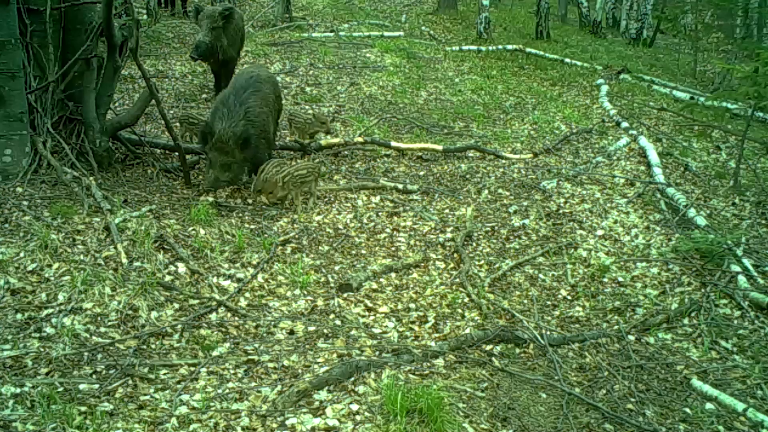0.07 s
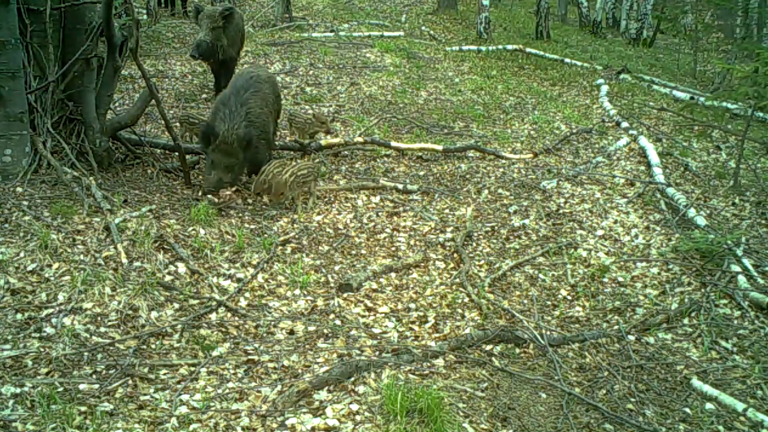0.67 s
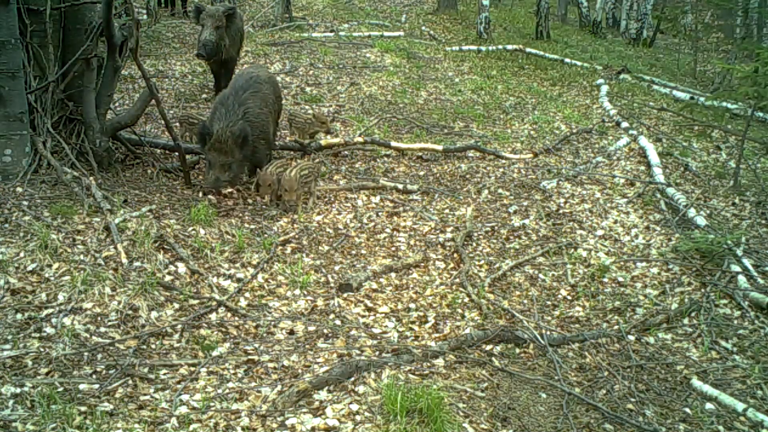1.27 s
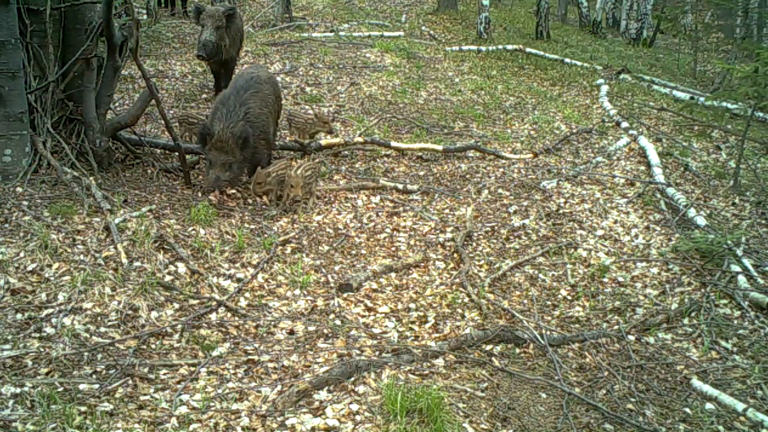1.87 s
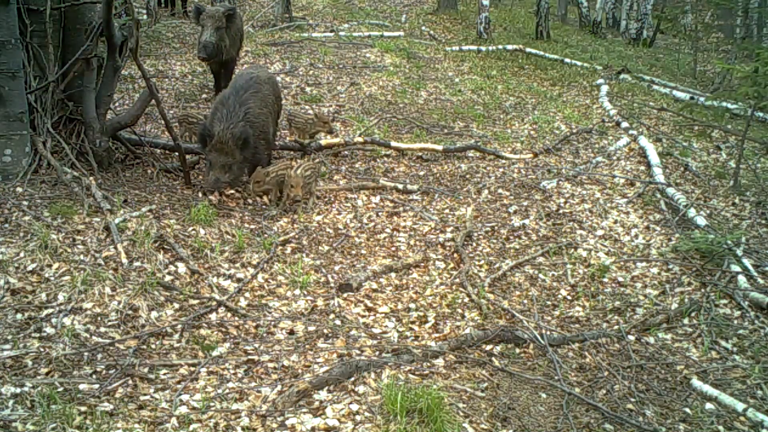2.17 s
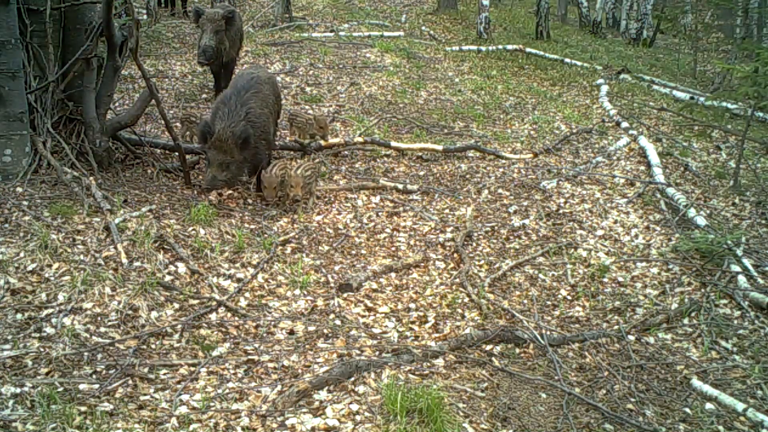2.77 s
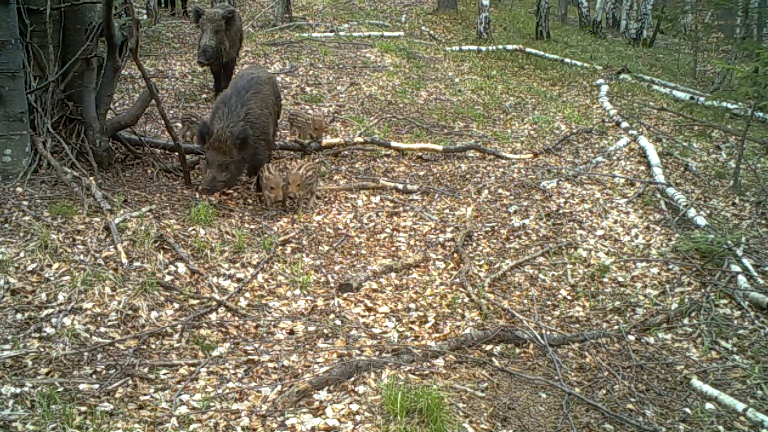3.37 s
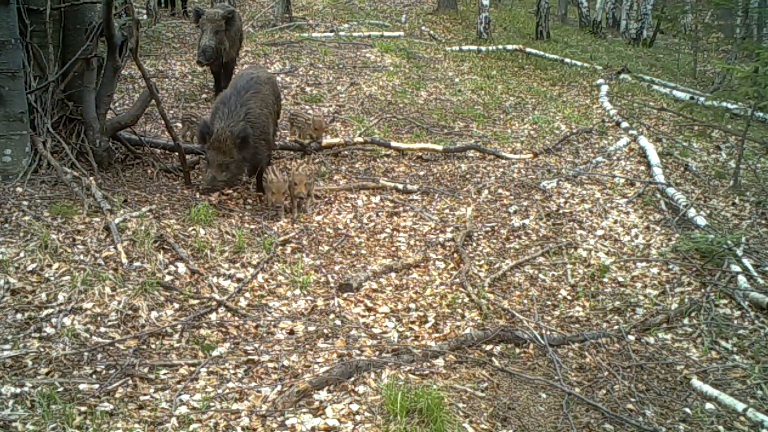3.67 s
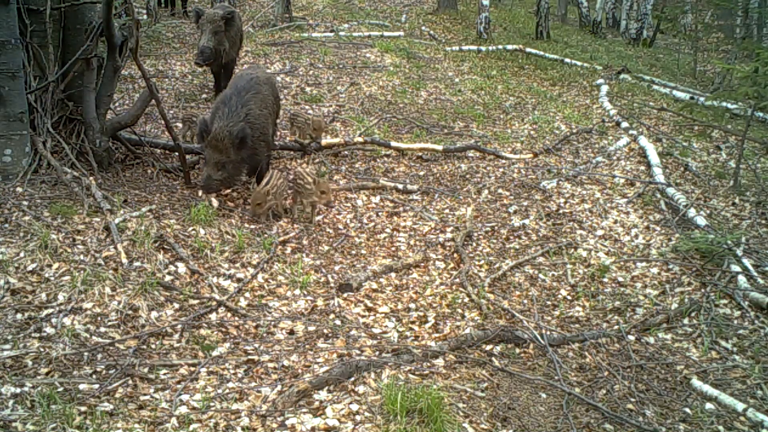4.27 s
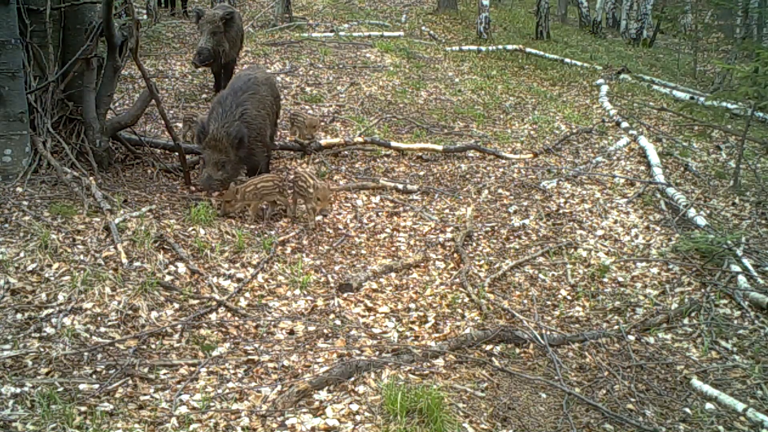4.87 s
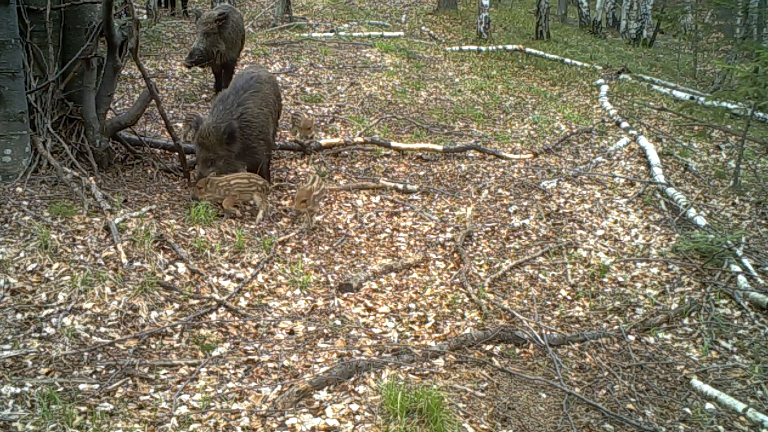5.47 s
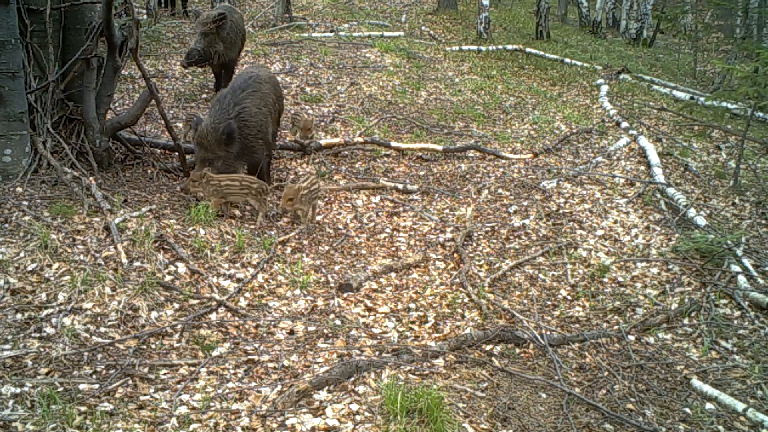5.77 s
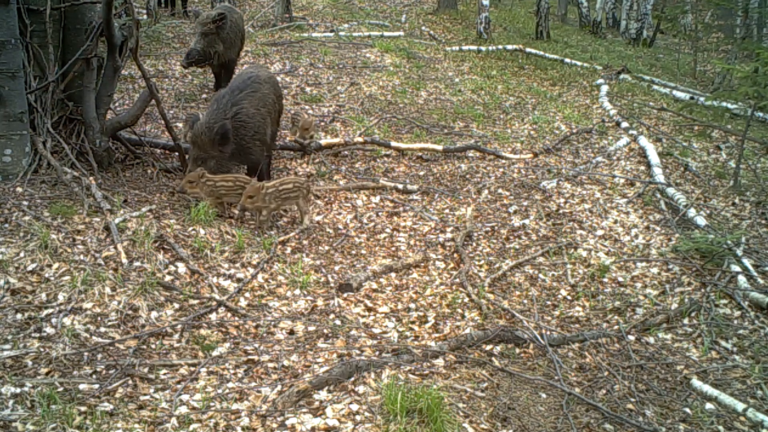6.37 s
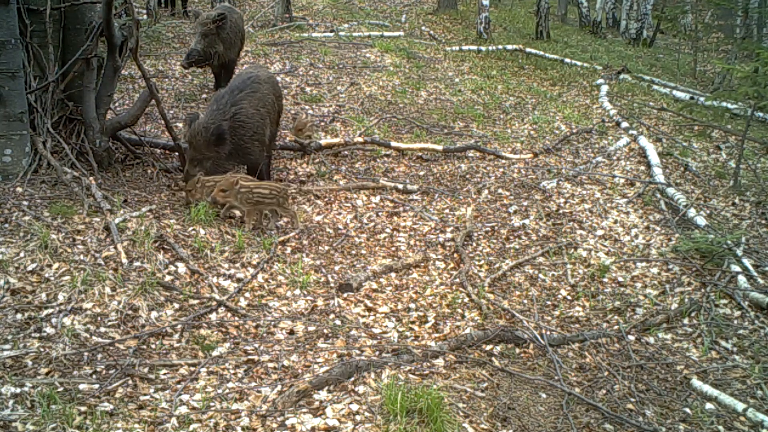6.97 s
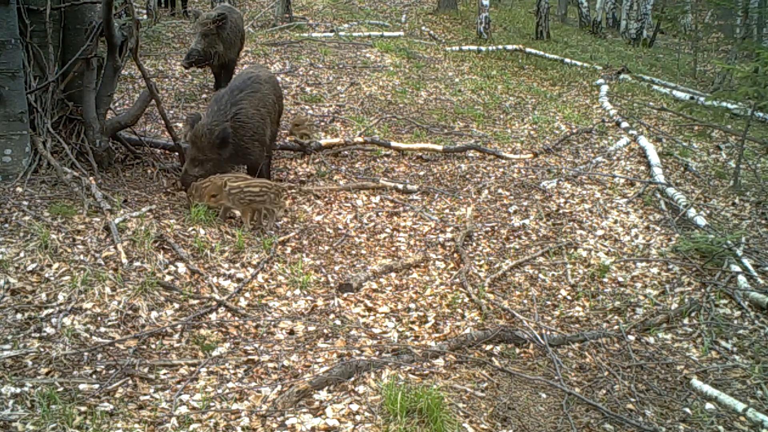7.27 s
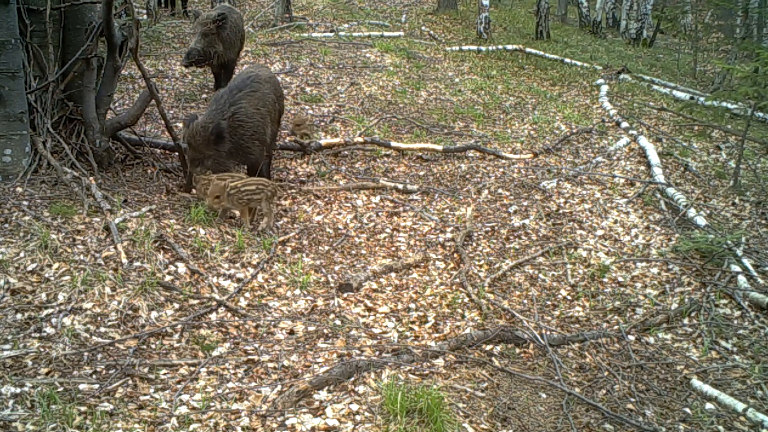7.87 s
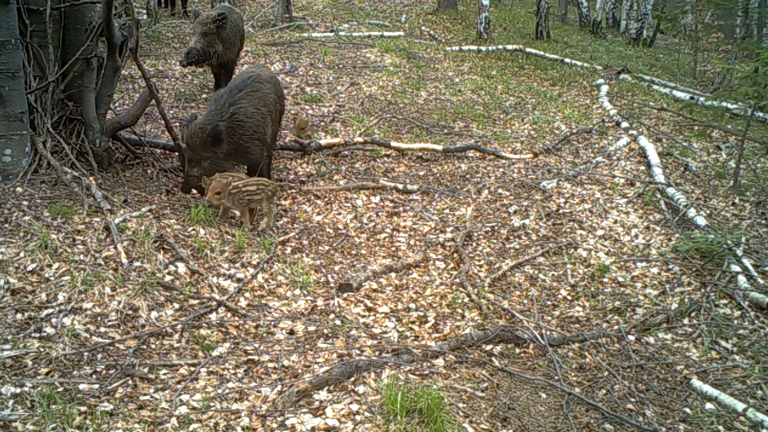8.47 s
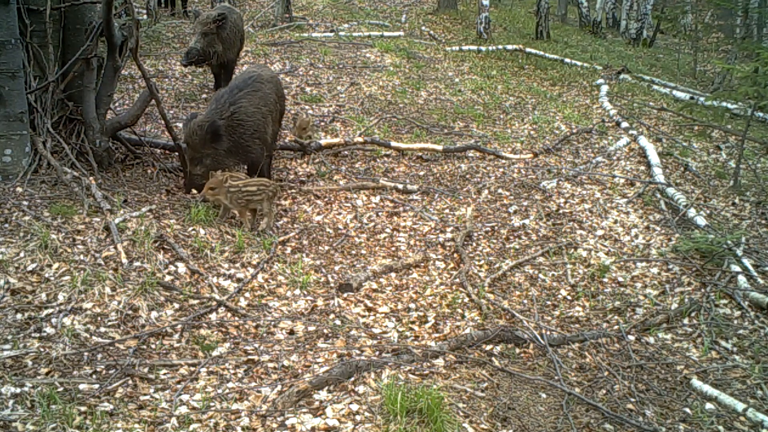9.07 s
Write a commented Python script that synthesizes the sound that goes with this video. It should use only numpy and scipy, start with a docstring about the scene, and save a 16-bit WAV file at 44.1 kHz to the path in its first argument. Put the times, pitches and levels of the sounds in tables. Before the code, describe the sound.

A trail camera's microphone switches on with a pop and a quick run of ticks. A quiet, steady hush with low rumble and hum follows in a still wood. Some metres away, wild boar and piglets forage: a couple of soft hoof falls come first, then faint shuffles and crackles in dry leaves. The rustling is busiest midway, with a few tiny twig snaps, then thins out.

```python
"""Wild boar and their piglets forage in dry leaves, some metres from a trail camera in a still wood.
Snouts and feet stir faint swarms of tiny leaf cracks; a few twigs snap and hooves puff softly in the soil.
The camera's input wakes with a pop and ticks as its gain steps up; after that a steady bed of hush,
low rumble and camera hum lies over the animals."""
import sys
import numpy as np
from scipy import signal
from scipy.fft import rfft, irfft
from scipy.io import wavfile

SR = 44100
rng = np.random.default_rng(int(sys.argv[2]) if len(sys.argv) > 2 else 0)


def transcribe(u):
    """Save the signal u as a 16-bit wav file named by the first command-line argument.

    u: samples, shape (n,) or (channels, n), limited to [-1, 1]; the rate is SR.
    q: integer samples, one column per channel.
    """
    v = np.clip(np.atleast_2d(u).T, -1, 1)
    q = np.round(v * 32767).astype(np.int16)
    wavfile.write(sys.argv[1], SR, q)


N = 402633
T = np.arange(N) / SR

# tone curve of the hush of wood and microphone: (frequency [Hz], relative level [dB])
HUSH_CURVE = [(15, -13.5), (42, -9), (60, -12.5), (90, -15), (150, -18), (280, -22), (430, -24),
              (1000, -28), (2000, -31.5), (3200, -35), (5200, -37.5), (7800, -40), (11500, -42),
              (15500, -46)]
# partials of the camera's hum: (pitch [multiple of the frame rate], level [dB])
HUM_PARTIALS = [(.5, -47.5), (1, -49.5), (1.5, -83), (2, -65.5)]
# soft hoof falls in the soil: (centre time [s], level [dB])
HOOF_FALLS = [(1.38, -59), (2.21, -58), (3.063, -61), (3.406, -61), (5.367, -56), (5.95, -59)]
# twigs and leaf stalks snapping: (time [s], peak level [dB], pitch [Hz])
TWIG_SNAPS = [(1.1218, -48, 4890), (4.6618, -48, 4780), (4.7626, -47, 4700), (4.793, -48, 4320),
              (4.9102, -47, 5000), (4.9237, -41, 5710), (5.6306, -45, 6200), (5.665, -46, 6040),
              (8.3315, -45, 4640)]
# envelope of snouts rooting in the leaves, busiest as a piglet trots across: (time [s], level [dB])
ROOTING_ENVELOPE = [(2.8, -82), (3.1, -79), (4.1, -73), (4.5, -69), (4.95, -67), (5.15, -75), (6.3, -72),
                    (7.0, -83), (8.35, -71), (9.1, -86)]
# feet pushing through the leaves: (centre time [s], length [s], level [dB], relative crunch level [dB])
FOOT_SHUFFLES = [(2.995, .09, -65, -3), (3.73, .08, -67.5, -4), (3.94, .11, -63.5, -1),
                 (4.285, .05, -63.5, 3), (4.40, .15, -62, -4), (5.66, .05, -69, 5)]
# ticks as the waking input climbs through its gain ranges, ever faster: (time [s])
RANGE_TICKS = [.0953, .1439, .1813, .2145, .2432, .268, .2893, .3091]


def from_db(db):
    """Decibels to gain."""
    return 10 ** (np.asarray(db) / 20)


def rms_one(x):
    """Scale to rms 1."""
    return x / np.sqrt(np.mean(x ** 2) + 1e-20)


def resonance(x, hz, width_hz):
    """Two-pole resonance applied twice for steep skirts, unity gain at the peak."""
    radius = np.exp(-np.pi * width_hz / SR)
    gain = (1 - radius ** 2) / 2
    section = [gain, 0, -gain, 1, -2 * radius * np.cos(2 * np.pi * hz / SR), radius ** 2]
    return signal.sosfilt([section, section], x + 1e-18)


def swell(centre, length):
    """Bell-shaped fade in and out, above half height for the given length."""
    return 2 ** -np.minimum((2 * (T - centre) / length) ** 2, 60)


def hush(level_db=-50.7):
    """The bed of wood and microphone: even noise that slopes gently from bass to treble."""
    hz = np.maximum(np.fft.rfftfreq(N, 1 / SR), 1)
    points_hz, points_db = np.transpose(HUSH_CURVE)
    colour = from_db(np.interp(np.log(hz), np.log(points_hz), points_db))
    return from_db(level_db) * rms_one(irfft(rfft(rng.standard_normal(N)) * colour, N))


def rumble(hz=9.2, width_hz=16, level_db=-49.5):
    """A narrow band of sub-bass noise that wavers slowly."""
    sub = resonance(rng.standard_normal(N + SR), hz, width_hz)[SR:]   # a second of pre-roll to settle
    return from_db(level_db) * rms_one(sub)


def camera_hum(frame_hz=30):
    """Steady low tones from the camera's electronics, locked to its frame rate."""
    return sum(np.sqrt(2) * from_db(db) * np.sin(2 * np.pi * (multiple * frame_hz * T + rng.random()))
               for multiple, db in HUM_PARTIALS)


def waking_input(x, wake_s=.0576, settle_s=.073, step_db=.5, dip_db=1.0, switch_s=.0005):
    """The input opens on a bias that drains away: opening pops, and every gain step on that bias ticks."""
    age = np.maximum(T - wake_s, 0) / settle_s
    bias = 1.05 * (1 + age) * np.exp(-age)   # two coupling stages settle in turn
    # fainter ticks: one ahead of the first range change, then two in each gap
    fine_ticks = [.0777] + [s + share * (later - s) for s, later in zip(RANGE_TICKS, RANGE_TICKS[1:])
                            for share in (.395, .715)]
    steps_to_come = sum(T < s for s in [*fine_ticks, *RANGE_TICKS])
    # the gain dips briefly at a range change, so that tick is louder
    switching = sum((T >= s - switch_s) & (T < s) for s in RANGE_TICKS)
    gain = from_db(-step_db * steps_to_come - dip_db * switching)
    return (x + bias) * gain * (T >= wake_s)


def hooves(band_hz=(130, 480), length_s=.11):
    """Weight pressed into soft litter gives a dull puff."""
    soil = signal.sosfilt(signal.butter(2, band_hz, "band", fs=SR, output="sos"), rng.standard_normal(N))
    return rms_one(soil) * sum(from_db(db) * swell(centre, length_s) for centre, db in HOOF_FALLS)


def twigs(tear_s=.0031, width_hz=2700, overtone_db=-12, knock_db=-4, trim_db=.1):
    """A stalk tears in a few milliseconds, rings at its pitch and an octave up, and knocks on the litter."""
    track, age = np.zeros(N), T[:SR // 20]
    for s, db, hz in TWIG_SNAPS:
        tear = rng.standard_normal(len(age)) * np.exp(-age / tear_s)
        ring = resonance(tear, hz, width_hz)
        overtone = from_db(overtone_db) * resonance(tear, 2 * hz, 2 * width_hz)
        knock = from_db(knock_db) * resonance(tear, hz=1500, width_hz=1400)
        snap = ring + overtone + knock
        start = round(s * SR)
        track[start:start + len(age)] += from_db(db + trim_db) * snap / np.abs(snap).max()
    return track


def leaves(cracks_per_s=2200, spread_db=4.0, crisp_db=-9, rooting_crunch_db=-1):
    """Snouts and feet stir swarms of tiny cracks that ring briefly in dry blades, over a duller crunch."""
    shape = (3, N)   # thin edges, blades and the packed layer below crack separately
    sizes = from_db(spread_db * np.minimum(rng.exponential(1, shape), 4)) * rng.choice([-1, 1], shape)
    cracks = sizes * (rng.random(shape) < cracks_per_s / SR)
    crisp = from_db(crisp_db) * rms_one(resonance(cracks[0], hz=10800, width_hz=4500))
    blades = rms_one(resonance(cracks[1], hz=4960, width_hz=3100))
    body = rms_one(resonance(cracks[2], hz=1750, width_hz=1700))
    stir = from_db(np.interp(T, *np.transpose(ROOTING_ENVELOPE)))
    crunch = stir * from_db(rooting_crunch_db)
    for centre, length, db, crunch_db in FOOT_SHUFFLES:
        push = from_db(db) * swell(centre, length)
        stir = np.hypot(stir, push)   # the envelopes add in power
        crunch = np.hypot(crunch, push * from_db(crunch_db))
    return stir * (crisp + blades) + crunch * body


def scene():
    """Mono mix of the steady bed and the foraging boar."""
    return (hush() + rumble() + leaves() + twigs() + hooves() + camera_hum())[None]


def record(dry):
    """The camera's input wakes up, and a steep high cut takes off the very top."""
    high_cut = signal.firwin(255, cutoff=15850, fs=SR)
    return signal.fftconvolve(waking_input(dry), high_cut[None], mode="same")


dry = scene()
out = record(dry)
transcribe(out)
```